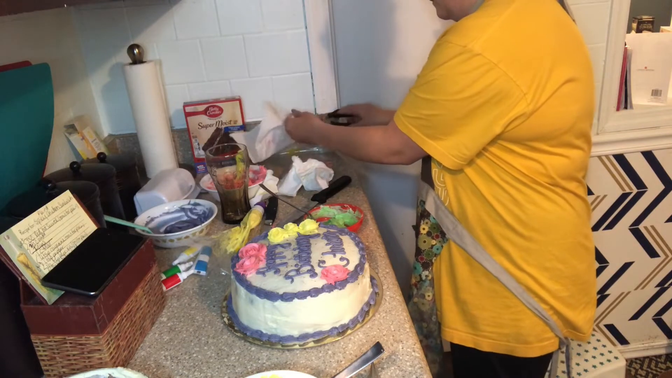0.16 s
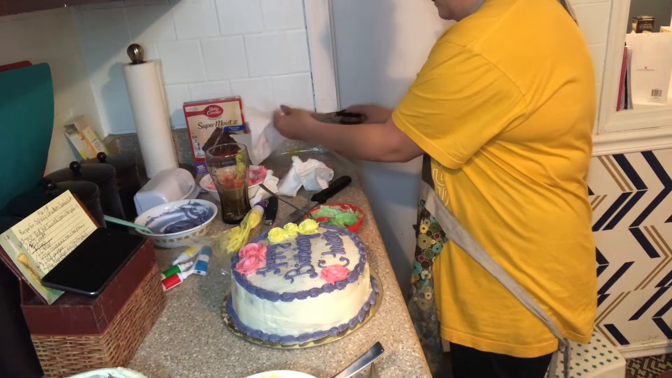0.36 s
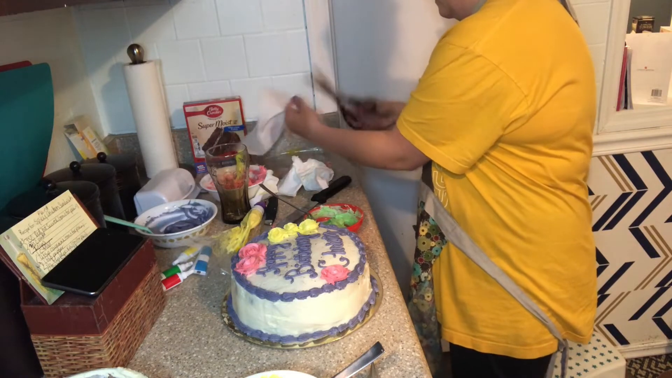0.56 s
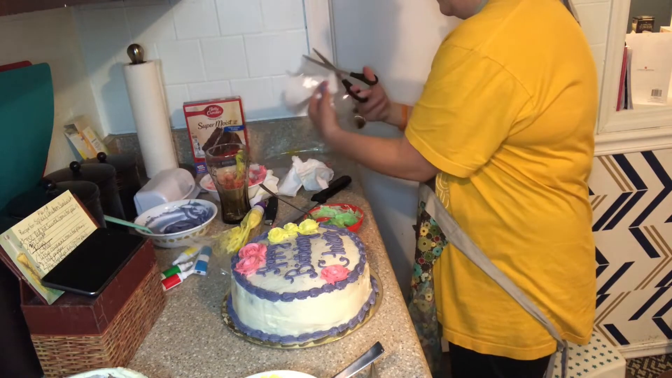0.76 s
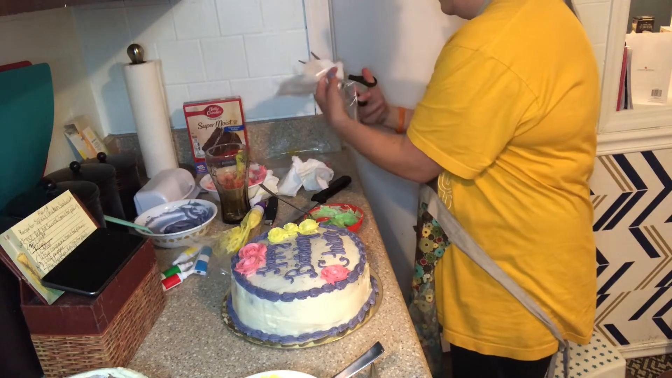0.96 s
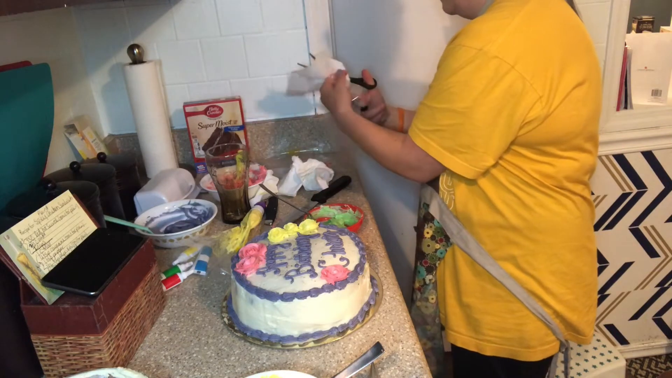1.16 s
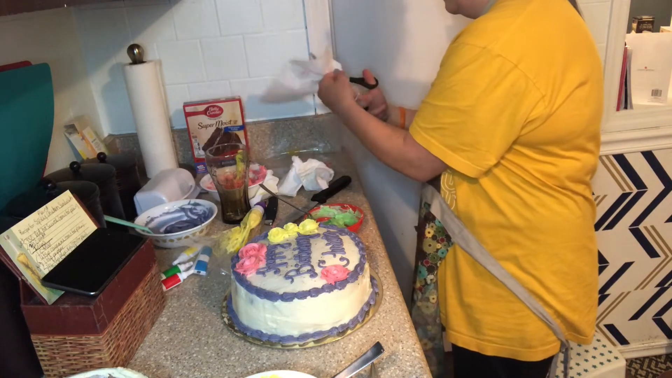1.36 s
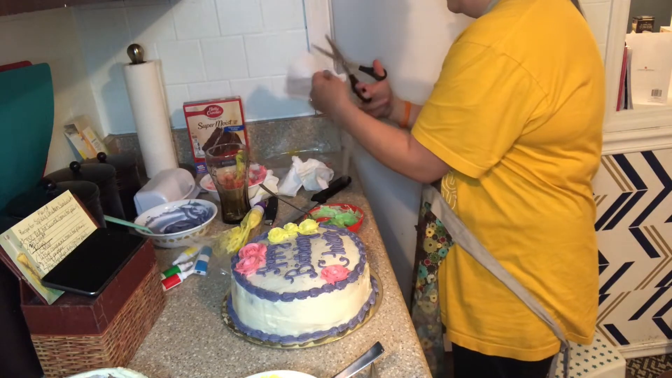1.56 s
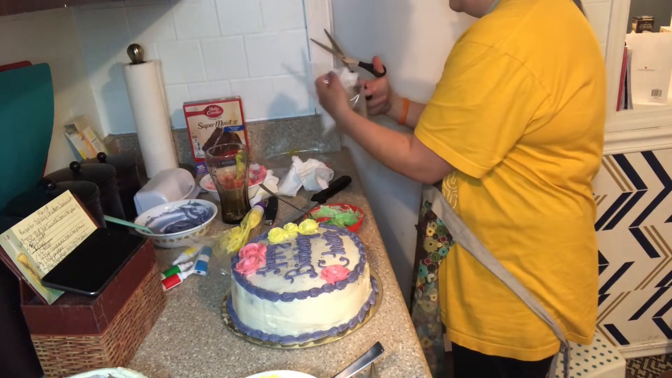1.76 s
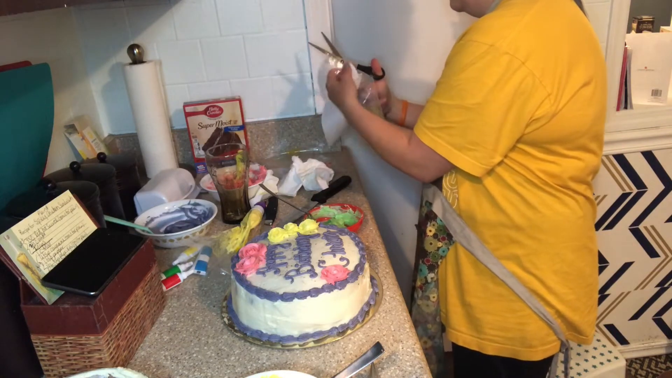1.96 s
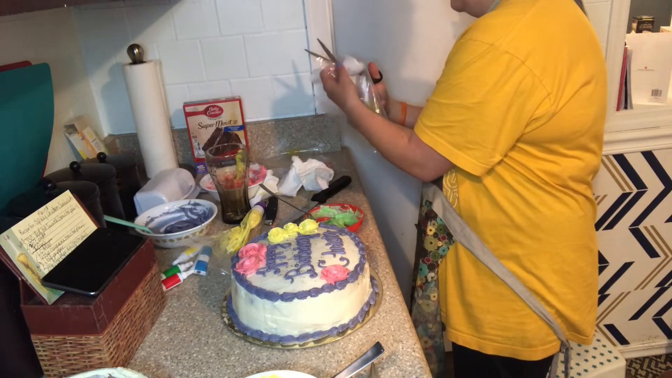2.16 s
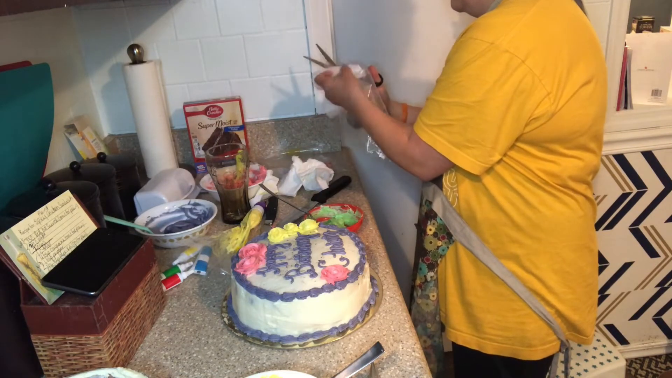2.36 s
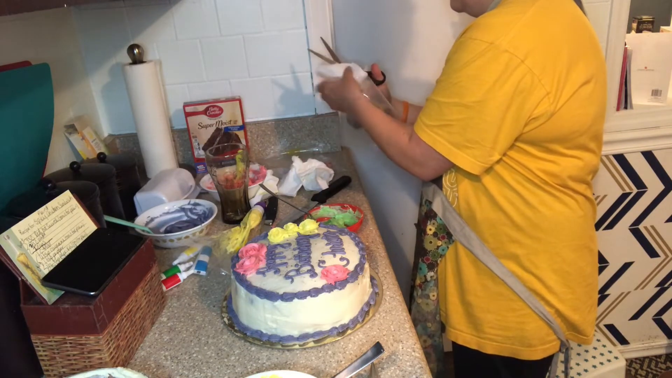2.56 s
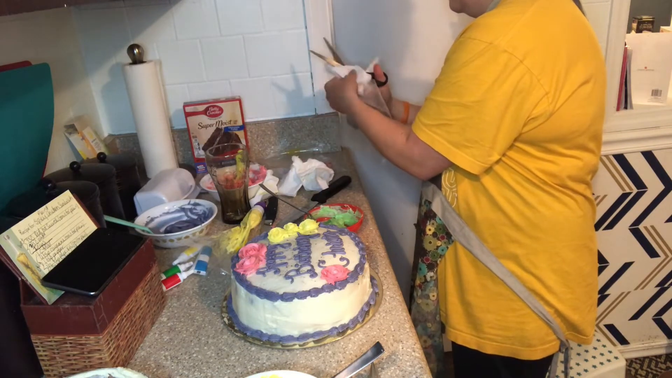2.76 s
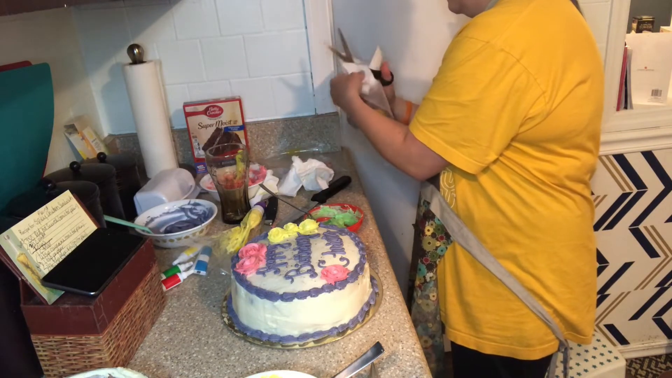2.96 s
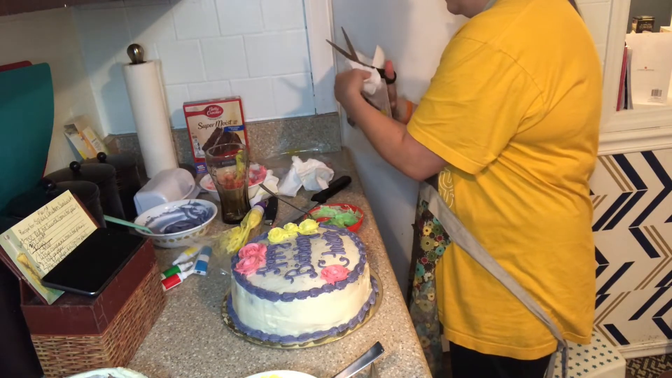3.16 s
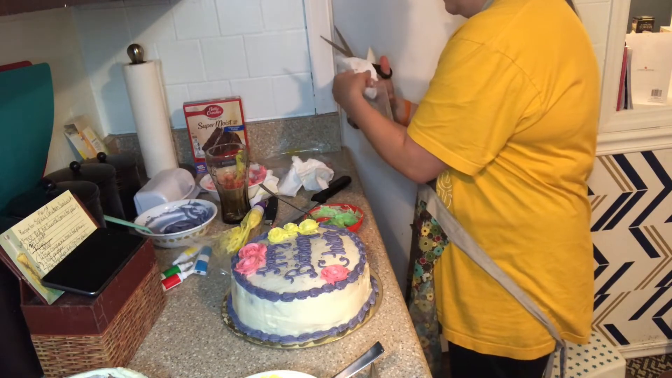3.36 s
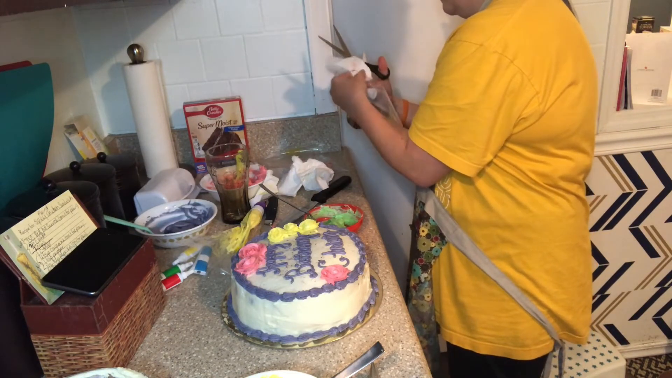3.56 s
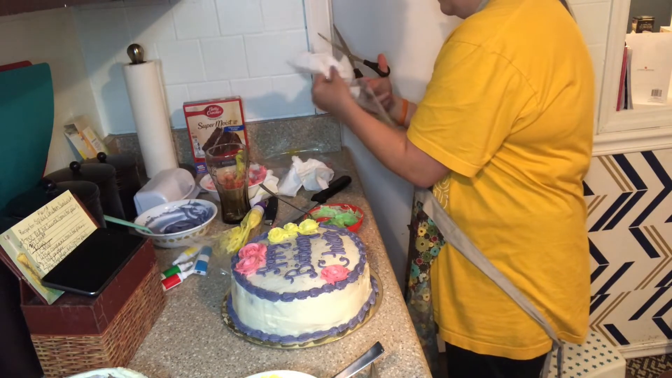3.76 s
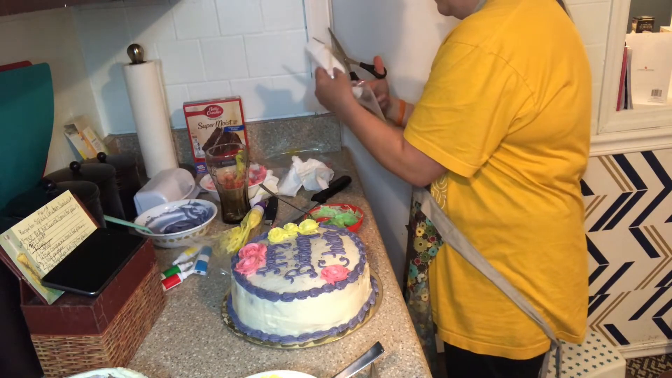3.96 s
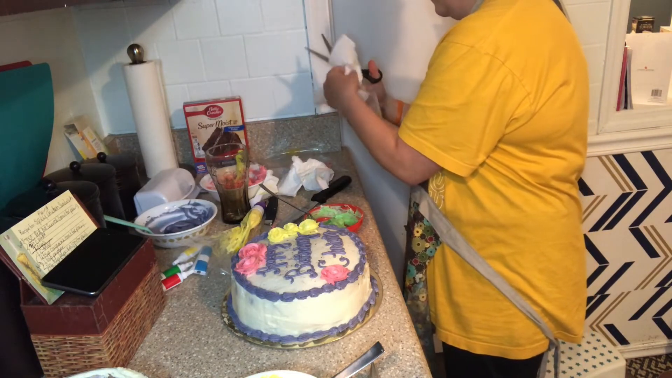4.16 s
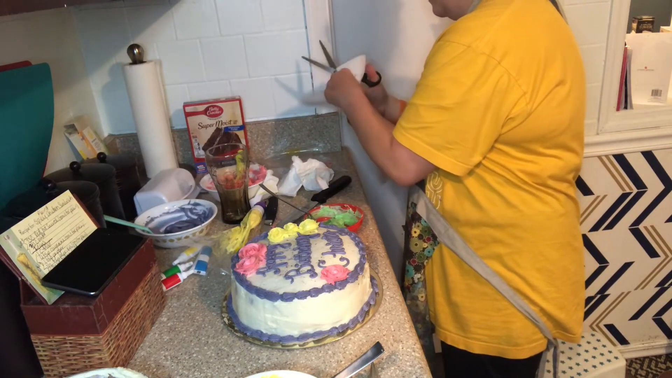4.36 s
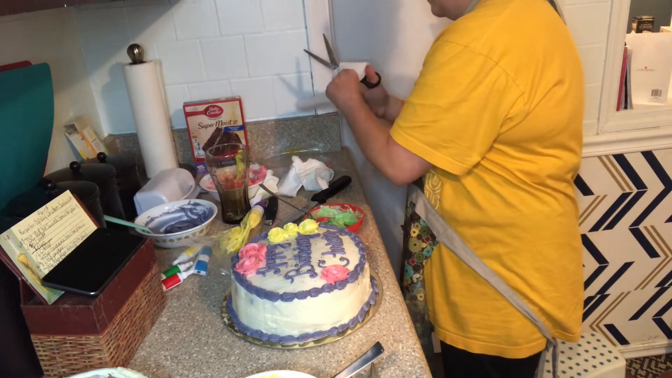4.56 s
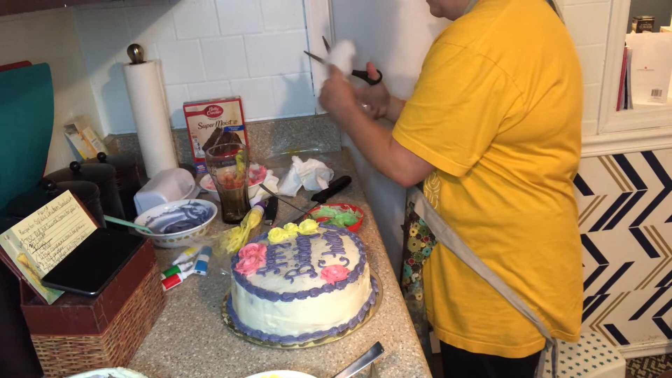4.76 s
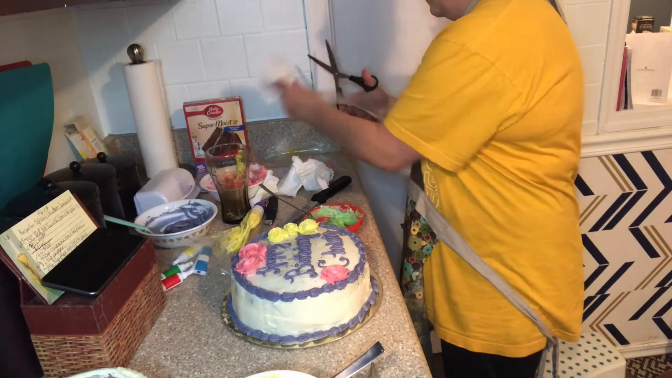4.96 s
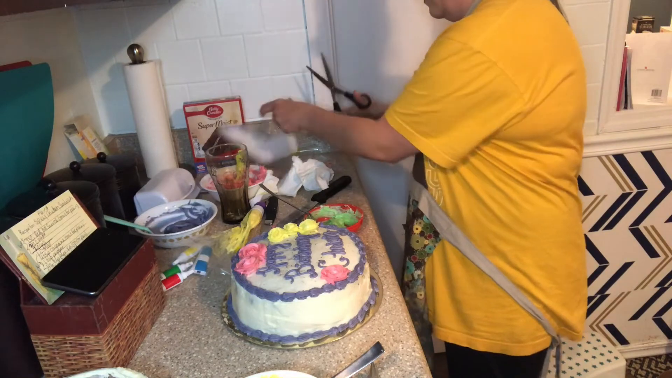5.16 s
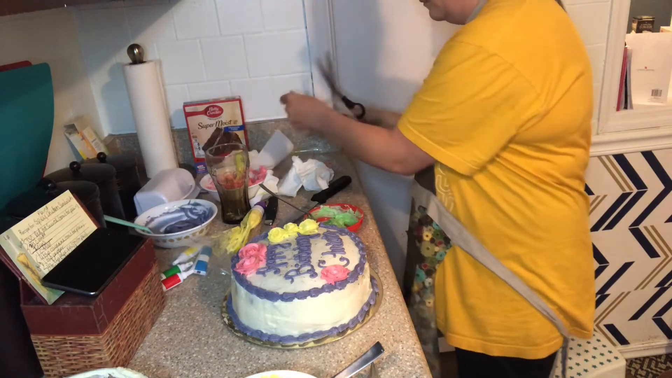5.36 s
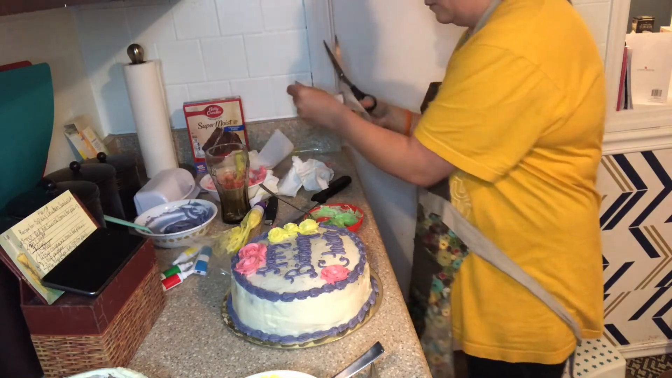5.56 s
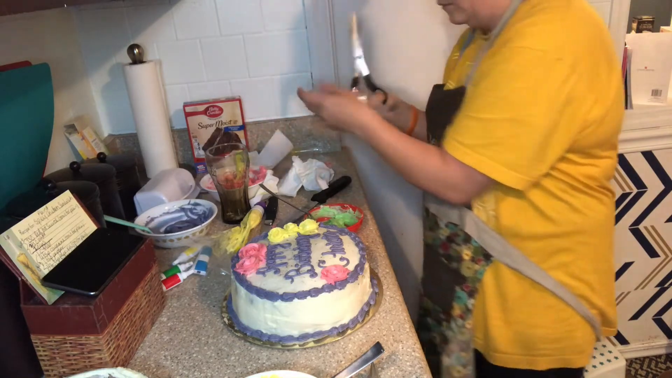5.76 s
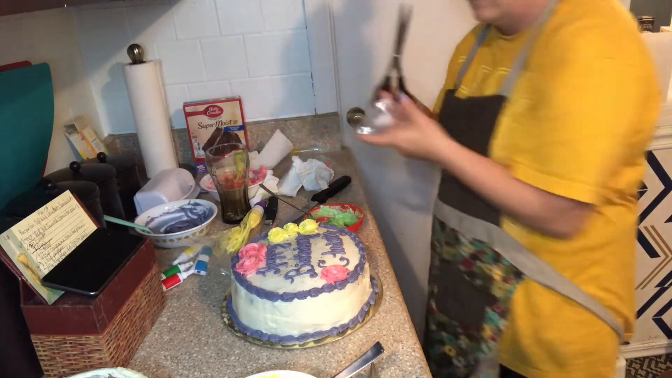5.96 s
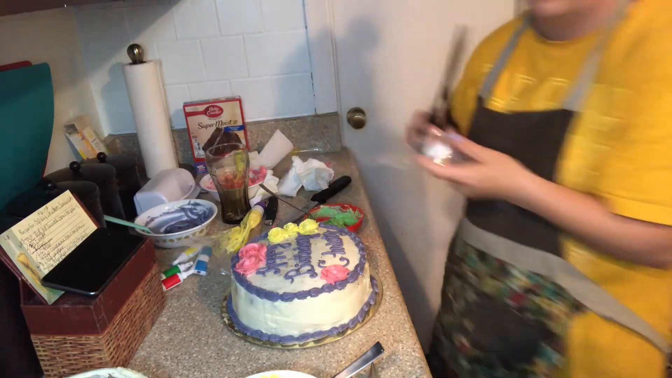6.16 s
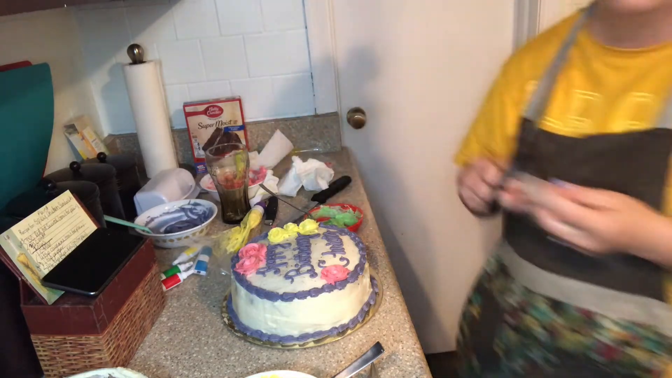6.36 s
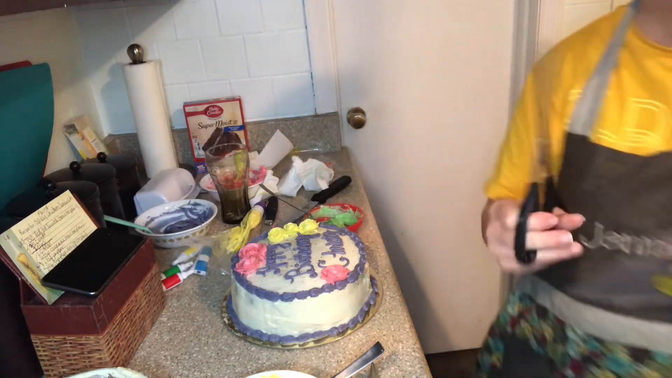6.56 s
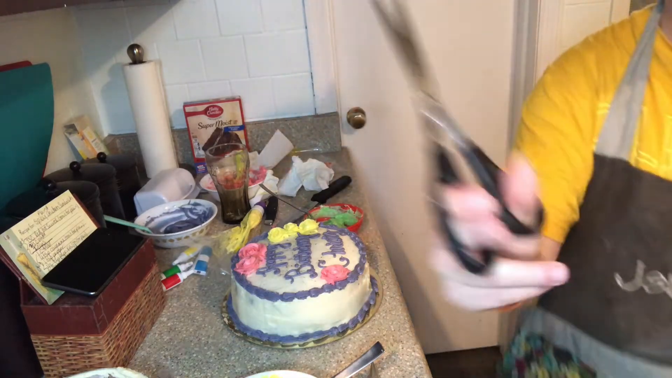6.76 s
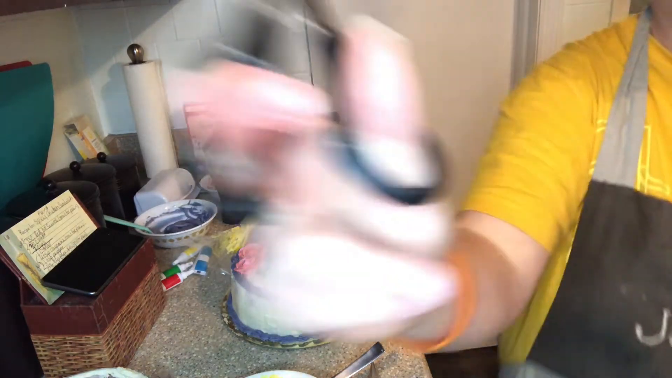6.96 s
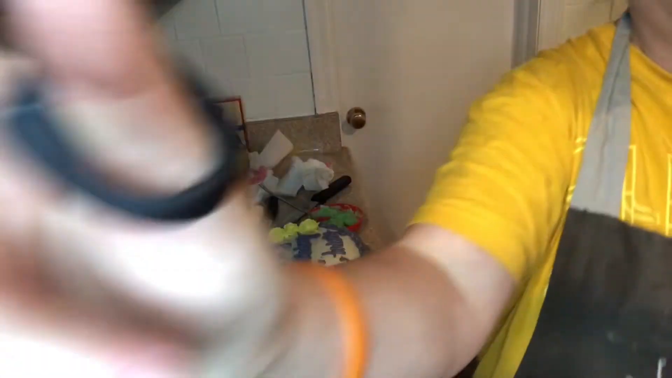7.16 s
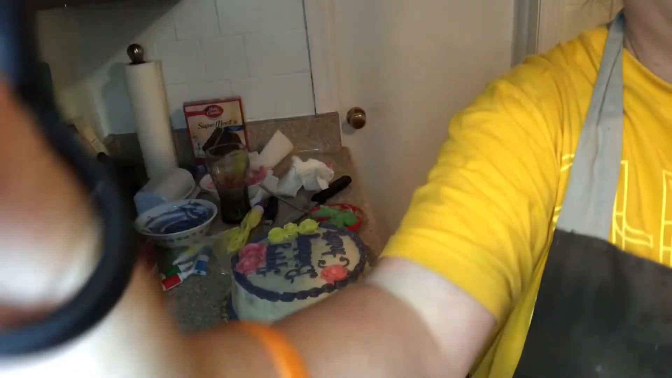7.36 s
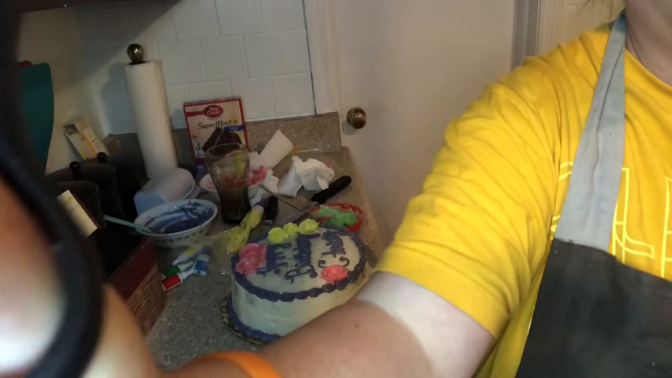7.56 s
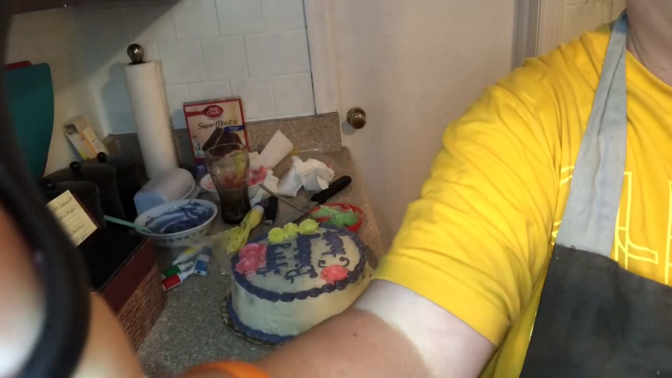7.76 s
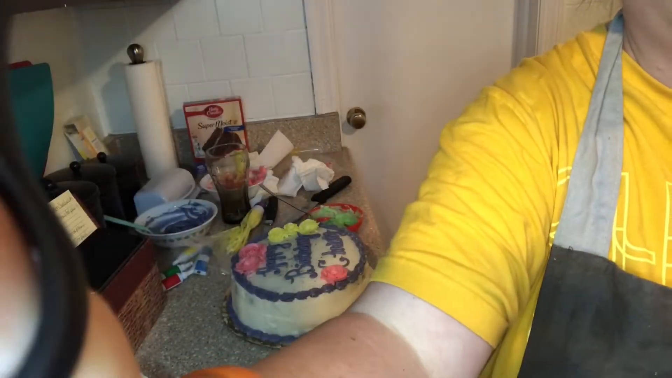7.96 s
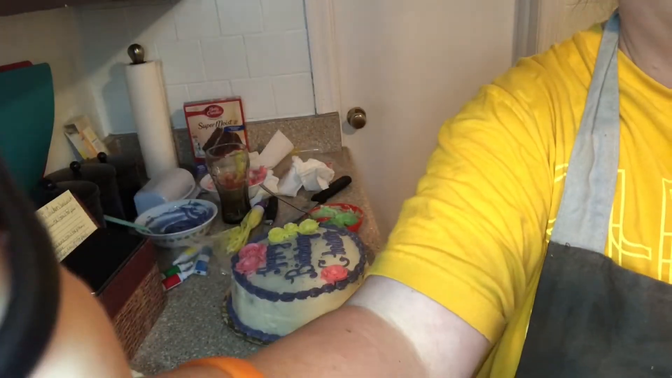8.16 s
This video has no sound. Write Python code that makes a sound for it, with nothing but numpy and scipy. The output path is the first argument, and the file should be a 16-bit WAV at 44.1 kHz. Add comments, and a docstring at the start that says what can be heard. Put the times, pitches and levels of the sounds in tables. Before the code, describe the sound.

Crisp plastic film crackling and sharp little snips over a faint appliance hum, ending with dull, close handling knocks.

```python
"""In a small kitchen an appliance hums over low rumble and faint hiss, built from two sines and coloured noise.
From the start fingers rustle a thin plastic piping bag: random crease flips, shaped by strokes and a pouch ring.
From 0.4 s the film snaps, snipped with scissors and crumpled: compact pulses with close echoes and a tail.
The low background stands higher from 2.05 to 7.55 s; near 7.3 and 7.5 s a close hand pushes air as rumble.
At 7.5 s skin hisses past the microphone port, and from 7.8 s fingers knock on the ringing microphone case."""
import sys
import numpy as np
from scipy import signal
from scipy.fft import rfft, irfft, next_fast_len
from scipy.io import wavfile

SR = 44100
rng = np.random.default_rng(int(sys.argv[2]) if len(sys.argv) > 2 else 0)


def master(y):
    """Save y as 16-bit WAV."""
    cut = np.clip(np.atleast_2d(y).T, -1, 1)
    pcm = np.round(cut * 32767)  # scale
    wavfile.write(sys.argv[1], SR, pcm.astype(np.int16))


N = 362061
TIME = np.arange(N) / SR


def from_db(db):
    """Decibels to gain."""
    return 10 ** (np.asarray(db) / 20)


def rms_one(x):
    """Scale to an rms of 1."""
    return x / np.sqrt(np.mean(x ** 2) + 1e-20)


def in_time(rows):
    """Draw the columns of a curve table at every sample."""
    s, *columns = np.transpose(rows)
    return [np.interp(TIME, s, column) for column in columns]


def at_hz(points, hz):
    """Read a spectrum on a log-frequency axis."""
    point_hz, value = np.transpose(points)
    return np.interp(np.log(hz), np.log(point_hz), value)


def bins(size):
    """Frequencies of an FFT, kept above zero."""
    return np.maximum(np.arange(size // 2 + 1) * SR / size, 1)


def bell(hz, centre_hz, octaves):
    """A resonance bump of height 1."""
    return np.exp(-(np.log2(hz / centre_hz) / octaves) ** 2)


def pulse(level_db):
    """The causal, most compact (minimum-phase) pulse that has this spectrum."""
    cepstrum = irfft(np.log(from_db(level_db)))
    half = len(cepstrum) // 2
    # folding the cepstrum forward packs the energy at the start
    cepstrum[1:half] *= 2
    cepstrum[half + 1:] = 0
    return irfft(np.exp(rfft(cepstrum)))[:half]


def split(x, centres_hz):
    """Overlapping bands that sum to x."""
    size = next_fast_len(len(x), real=True)
    size += size % 2
    spectrum = rfft(x, size)
    log_hz, log_centres = np.log(bins(size)), np.log(centres_hz)
    bands = []
    for share in np.eye(len(centres_hz)):
        weight = np.interp(log_hz, log_centres, share)
        bands.append(irfft(spectrum * weight)[:len(x)])
    return bands


def noise(colour):
    """Steady noise of a given colour; rms 1."""
    size = 2 * next_fast_len(N // 2 + 1)
    white = rfft(rng.standard_normal(size))
    gain = from_db(at_hz(colour, bins(size)))
    return rms_one(irfft(white * gain)[:N])


def drift(rate_hz):
    """Slow chance with a spread of 1: noise through two equal low-pass poles at rate_hz."""
    step, warm_up = 40, 2000  # samples per slow value; slow values dropped while the filter settles
    r = np.exp(-2 * np.pi * rate_hz * step / SR)
    white = rng.standard_normal(N // step + warm_up + 2)
    slow = signal.lfilter([1], [1, -2 * r, r * r], white)[warm_up:]
    return np.interp(np.arange(N) / step, np.arange(len(slow)), rms_one(slow))


def add(out, s, sound):
    """Mix a sound in at a time."""
    start = int(s * SR)
    out[start:start + len(sound)] += sound[:max(N - start, 0)]


# low rumble: pitch_hz, colour_db
RUMBLE_COLOUR = [(20, -46), (35, -17), (55, 4), (80, -0.5), (105, 4), (135, 2), (164, 2), (190, -8.5),
                 (280, -6.5), (450, -36), (900, -37)]
# still air of the room: pitch_hz, colour_db (per Hz, only its shape is used)
AIR_COLOUR = [(25, -125), (100, -100), (300, -94.5), (600, -101), (1200, -108), (2500, -113), (7500, -118),
              (9000, -123.5), (16000, -128)]
# the hand comes close and pushes air at the microphone: centre_s, width_s, rumble_rise_db
PUFFS = [(7.3, 0.066, 9.5), (7.5, 0.024, 4.5)]


def background(waver_db=2.5):
    """An appliance hums at twice the mains rate over low rumble and faint hiss."""
    hum_hz, octave_db = 119.8, -13
    swell_from_s, swell_to_s, swell_edge_s = 2.05, 7.55, 0.027
    inside_s = np.minimum(TIME - swell_from_s, swell_to_s - TIME)
    swell = np.clip(inside_s / swell_edge_s + .5, 0, 1)

    phase = 2 * np.pi * hum_hz * TIME
    tone = rms_one(np.sin(phase) + from_db(octave_db) * np.sin(2 * phase))
    hum_db = -71.5 + 7.5 * swell + waver_db * drift(rate_hz=4.8)

    rumble_db = -68.5 + 7 * swell
    for s, width_s, rise_db in PUFFS:
        rumble_db += rise_db * np.exp(-((TIME - s) / width_s) ** 2)

    hum = tone * from_db(hum_db)
    rumble = from_db(rumble_db) * noise(RUMBLE_COLOUR)
    hiss = from_db(-71.5) * noise(AIR_COLOUR)
    return hum + rumble + hiss


# echoes from the tiles and the counter: delay_s (before its random wander), gain (before energy scaling)
NEAR_ECHOES = [(.0009, 0.49), (.0026, 0.78), (.0058, 0.27)]


def near_path(scatter, scatter_s=0.0092, wander=.12):
    """First crack, its close echoes and the short, dense crackle that follows; energy 1."""
    t = TIME[:SR // 2]
    path = rng.standard_normal(len(t)) * np.exp(-(t / scatter_s) ** 2)
    path *= scatter / np.linalg.norm(path)
    path[0] += 1
    for delay_s, gain in NEAR_ECHOES:
        wandered_s = delay_s * np.exp(wander * rng.standard_normal())
        path[int(wandered_s * SR)] += gain
    return path / np.linalg.norm(path)


# kitchen decay: pitch_hz, t60_s
KITCHEN_DECAY = [(250, 0.37), (1000, 0.4), (2500, 0.4), (6000, 0.34), (14000, 0.3)]


def kitchen_tail(build_s=0.012):
    """Diffuse reverberation that builds up and dies soonest in the treble; energy 1."""
    t = TIME[:SR // 2]
    centres_hz, t60s = np.transpose(KITCHEN_DECAY)
    bands = split(rng.standard_normal(len(t)), centres_hz)
    decay = sum(band * np.exp(-np.log(1000) * t / t60_s) for band, t60_s in zip(bands, t60s))
    tail = decay * (1 - np.exp(-(t / build_s) ** 2))
    return tail / np.linalg.norm(tail)


def creases(per_s=750, spread_db=3.5, room_db=1.5, scatter=1.34, dwell_s=.18, count=8):
    """Tiny creases flip at random; as the hands move, their path through the room changes; rms 1."""
    strength = np.minimum(rng.exponential(1, N), 3.5)
    sizes = from_db(spread_db * strength) * rng.choice([-1, 1], N)
    flips = sizes * (rng.random(N) < per_s / SR)
    # the hands cycle through the spots; the random part blends one into the next
    spot = np.floor(TIME / dwell_s + .5 * rng.random(N)) % count
    out = np.zeros(N)
    for k in range(count):
        path = near_path(scatter) + from_db(room_db) * kitchen_tail()
        out += signal.fftconvolve(flips * (spot == k), path)[:N]
    return rms_one(out)


# faint crinkle of the bag held between strokes, before trim: start_s, level_db, treble_db
CRINKLE = [(0.0, -69, -70.5), (0.33, -65, -73), (0.7, -78, -77), (1.18, -60, -74), (1.87, -63, -71.5),
           (2.32, -61.5, -59.5), (3.28, -66.5, -69), (3.4, -67.5, -72), (4.69, -57, -61), (4.9, -57.5, -59),
           (5.29, -70, -74), (5.64, -81, -81), (5.97, -62.5, -69), (6.39, -62, -63), (6.56, -74, -80),
           (6.76, -80, -77), (7.16, -67.5, -73), (7.45, -83.5, -85)]
# strokes of the fingers over the film: full_speed_s, level_db, rise_s, hold_s,
# press_db (body, relative to level), slide_db (sheen, relative to level)
STROKES = [(0.246, -51, 0.07, 0.076, -33, -15), (0.301, -55.5, .02, 0.0091, -12, -4.5),
           (0.817, -56.5, 0.033, 0.015, -5, -12), (1.028, -52.5, 0.015, 0.016, -8.5, -16),
           (1.389, -50, 0.032, 0.053, -6, -14.5), (1.863, -62, 0.033, 0.026, 4, -13),
           (2, -58.5, 0.024, 0.045, -7, -14), (2.087, -58, 0.039, 0.068, 2, -5),
           (2.186, -50.5, .012, 0.031, -8, -7), (2.24, -57, .012, 0.0087, 7.5, -21),
           (2.366, -59, 0.031, 0.042, 3, -0.5), (2.493, -57.5, 0.024, 0.089, 0.5, -10),
           (2.642, -56, 0.026, 0.014, 0, -7.5), (2.86, -58.5, 0.039, 0.019, -1, -5.5),
           (3.084, -51.5, 0.023, 0.019, -2, -10.5), (3.195, -61.5, .04, 0.033, 2.5, -10),
           (3.269, -55.5, 0.055, 0.03, -2, -2.5), (3.377, -63, 0.028, 0.0046, 2, -7),
           (3.635, -59, 0.054, 0.083, 2.5, -1.5), (4.106, -62.5, 0.043, .03, 5.5, -5.5),
           (4.253, -57, 0.044, 0.052, -0.5, -3), (4.462, -54.5, 0.023, 0.038, 0, -8),
           (4.557, -57.5, 0.024, .03, 0, -18), (4.76, -58.5, 0.035, 0.059, 3, -0.5),
           (4.88, -56, .015, 0.013, 1.5, -4), (5.135, -66.5, .01, 0.0069, 7, 0.5),
           (5.543, -65.5, 0.023, 0.08, 3.5, -10.5), (5.776, -56.5, 0.026, 0.016, -4, -6),
           (5.903, -66, .02, 0.023, 1, -1), (6.046, -52, 0.021, 0.013, -2.5, -6),
           (6.282, -56, 0.026, 0.026, 3, -7), (6.324, -57, .02, 0.045, 3.5, -9),
           (6.442, -50.5, 0.034, .012, -19, -8), (6.847, -65, 0.024, 0.008, -4, -6.5),
           (6.909, -61.5, 0.018, 0.056, -1, -1.5), (7.129, -68, .03, 0.016, 11, -4),
           (7.247, -55.5, 0.043, 0.012, -7.5, 2), (7.336, -74.5, 0.0092, .006, 17.5, -20)]


def handling():
    """Each stroke swells, holds and settles on top of the faint crinkle; gives level, body and sheen in dB."""
    settle_db_per_s = 157  # the creases calm down after every stroke
    crinkle_trim_db, sheen_trim_db = -0.5, -4
    crinkle_db, treble_db = in_time(CRINKLE)
    # the body follows only a share of the crinkle's swing
    body_db = -67 + 0.41 * (crinkle_db - crinkle_db.mean())
    at_rest_db = -settle_db_per_s * np.maximum(TIME - CRINKLE[-1][0], 0)
    held_db = np.array([crinkle_db + crinkle_trim_db, body_db, treble_db + sheen_trim_db])
    power = from_db(held_db + at_rest_db) ** 2

    # the film creaks as it is pulled taut, just before each snap
    loads = []
    for s, db, low_db, slope_db, _, _, linger_db in SNAPS:
        loads.append((s, db + linger_db - 50, 0.012, 0, low_db, slope_db - 1))

    for s, db, rise_s, hold_s, press_db, slide_db in list(STROKES) + loads:
        near = slice(*np.searchsorted(TIME, [s - .5, s + .5]))
        t = TIME[near] - s
        rise = np.exp(-(np.minimum(t, 0) / rise_s) ** 2)
        envelope = rise * from_db(db - settle_db_per_s * np.maximum(t - hold_s, 0))
        power[:, near] += np.outer(from_db([0, press_db, slide_db]), envelope) ** 2
    level, body, sheen = 10 * np.log10(power + 1e-20)
    return level, body - level, sheen - level


# colour of the rustle: pitch_hz, colour_db (per Hz, for a rustle of 0 dB)
RUSTLE_COLOUR = [(35, -76), (125, -34), (250, -31), (340, -36), (480, -27), (800, -34), (1200, -34.5),
                 (1600, -32.5), (2100, -38), (4000, -34.5), (7700, -38.5), (10000, -42), (15500, -48)]
# the hollow of the bag rings high while it hangs open and low inside the cupped hand:
# start_s, ring_hz, ring_db (before the drain)
POUCH = [(0.1, 2390, 11), (0.26, 2170, 13), (1.0, 2270, 3.5), (1.45, 1900, 6.5), (2.14, 3000, 0),
         (2.19, 2900, 21), (2.27, 2500, 4.5), (2.7, 1980, 1.5), (2.9, 990, 5), (4.1, 990, 2),
         (4.5, 800, 8.5), (5.75, 810, 2.5), (6.35, 2600, -1), (6.48, 2590, 14), (6.85, 2540, -4.5),
         (7.25, 2750, 7)]


def rustle(patchy_db=2.5, pouch_octaves=0.21, pouch_drain=0.29):
    """Pressing the film deepens its creases, sliding adds sheen, and the pouch gathers them around its pitch."""
    level_db, body_db, sheen_db = handling()
    pouch_hz, pouch_db = in_time(POUCH)
    centres_hz = np.r_[35, np.geomspace(125, 16000, 22)]
    out = np.zeros(N)
    for band, hz in zip(split(creases(), centres_hz), centres_hz):
        # how far each band follows the body and the sheen
        low = at_hz([(900, 1.0), (1550, 0.045)], hz)
        high = at_hz([(2700, 0.062), (4600, 0.73), (8000, 0.93), (14000, 1.3)], hz)
        colour_db = at_hz(RUSTLE_COLOUR, hz) + low * body_db + high * sheen_db
        # the drain takes from every band a share of what the ring gains
        ring_db = pouch_db * (bell(hz, pouch_hz, pouch_octaves) - pouch_drain)
        patches_db = patchy_db * drift(rate_hz=21.4)
        out += band * from_db(level_db + colour_db + ring_db + patches_db)
    return out * np.sqrt(SR / 2)  # from level per Hz to full band


# snips and snaps of the film: start_s, level_db, body_db, slope_db (per octave of treble), ring_hz, ring_db,
# linger_db (tail, before trim)
SNAPS = [(0.4468, -10, -12, -16, 2120, 11.5, -2.5), (0.691, -28, -2, -9, 1580, 5, -18),
         (0.8391, -13.5, -29, -6.5, 7600, 0, -2.5), (0.9713, -14.5, -16, -15, 3300, 3, -2),
         (0.988, -5.5, -27, -13.5, 1970, 5, -7), (1.1275, -19, -2, -13, 3770, 6, -2),
         (1.169, -8.5, -8, -6.5, 2020, 10, -5), (1.2365, -15.5, -8, -11, 3020, 9, -7),
         (1.2578, -17.5, -25, -1, 4040, 10.5, -7.5), (1.5212, -19, 2, -14, 3100, 3, -10),
         (1.5982, -10, -17, -8.5, 930, 7, -5), (1.6026, -13, -11, -14, 2160, 5.5, -7),
         (1.6526, -11.5, -26, -11.5, 1880, 5.5, -10), (1.8826, -14, 0.5, -8.5, 3470, 8, -9),
         (1.9152, -13, -19, -10.5, 5440, 6, -0.5), (2.1692, -8.5, -1, -1.5, 3070, 2, 1),
         (2.206, -17, -6, -2, 1240, 11, -7), (2.4571, -14, -5, -0.2, 7400, 2, 3.5),
         (2.5535, -20, -3, -8.5, 5360, 16, 4.5), (2.642, -17.5, 4, -5.5, 2040, 8, 4.5),
         (2.746, -23.5, -6, -4, 5440, 6.5, -1), (2.9717, -14, 3, -5.5, 7590, 0, 1.5),
         (3.88, -18.5, 6.5, -7, 3660, 9, 2), (3.9615, -14, 0.5, -2.5, 3900, 7.5, -1),
         (4.194, -11, 0.5, -3.5, 1550, 5, 0.5), (4.363, -17, 1, -2.5, 7800, 1.5, 1.5),
         (4.433, -14, 5, -10, 790, 6, -0.5), (4.5267, -12, -1, 1.5, 7180, 1.5, 0.5),
         (4.6406, -12, -4, -11, 3950, 4, -1.5), (4.7798, -9.5, 3.5, -2, 7040, 4.5, 2),
         (5.0093, -14, 4.5, -3, 1360, 7, 2), (5.742, -16, -4, -2, 4060, 10.5, 1.5),
         (5.8745, -18.5, 3.5, -3, 8000, 1, 3), (6.033, -15, 8.5, -10, 1890, 4, -9),
         (6.048, -14, -5, -2.5, 3000, 5, -1), (6.2105, -10, -3, -1, 4630, 3, -1),
         (6.26, -15.5, -3, -13, 1190, 13.5, -14), (6.324, -16, 7, -4, 1100, 7, -16),
         (6.4238, -4, -1, -5.5, 2570, 1.5, 0.5)]
# colour of a plain snap: pitch_hz, colour_db
SNAP_COLOUR = [(60, -28), (200, -9.5), (400, -3.5), (2500, -1.5), (8000, -4.5), (16000, -18)]


def snaps(tail_db=-1.5, body_hz=700, film_hz=1500, bright_hz=2500, ring_octaves=0.49,
          crackle_db=12.5, crackle_growth=0.56):
    """The film gives way at once; the taut patch around it rings briefly at a pitch set by its size."""
    out, hz = np.zeros(N), bins(size=2048)
    body_share = at_hz([(body_hz, 1), (film_hz, 0)], hz)
    treble_octaves = np.maximum(np.log2(hz / bright_hz), 0)
    for s, db, body_db, slope_db, ring_hz, ring_db, linger_db in SNAPS:
        colour_db = at_hz(SNAP_COLOUR, hz) + body_db * body_share
        colour_db += slope_db * treble_octaves + ring_db * bell(hz, ring_hz, ring_octaves)
        # every snap is a crack with a short crackle; those that linger crackle more
        crackle = near_path(from_db(crackle_db + crackle_growth * linger_db))
        path = crackle + from_db(linger_db + tail_db) * kitchen_tail()
        add(out, s, signal.fftconvolve(pulse(colour_db + db), path))
    return out


# a fingertip brushes past the microphone port: start_s, level_db
BRUSH = [(7.45, -115), (7.48, -64.5), (7.515, -74), (7.54, -115)]
# colour of its hiss: pitch_hz, colour_db
BRUSH_COLOUR = [(3000, -35), (8000, -10), (12000, 0), (15500, -6)]


def brush():
    """Skin sliding close to the port gives a thin, high hiss."""
    level_db, = in_time(BRUSH)
    return from_db(level_db) * noise(BRUSH_COLOUR)


# fingers on the case: start_s, level_db, pitch_ratio, low_ring_db, high_ring_db, tick_db,
# scuff_db (relative to level)
KNOCKS = [(7.824, 2, 0.78, 2.5, 2, -52, -23.5), (7.8759, -33, 0.82, 12, 3, -60, -6),
          (7.883, -22, 1, 0, 9, -60, -13), (7.8893, -9, 0.76, 3, 2, -45, -19),
          (8.1660, 7, 0.82, 3.5, 3, -33, -15.5), (8.18, -13.5, 0.76, 26, 5, -45, -6),
          (8.1893, 10.5, 1.17, 19, 9, -34, -12), (8.1989, 8, 1.47, 17.5, 11, -10, -24)]
# colour of a soft knock, at pitch ratio 1: pitch_hz, colour_db
KNOCK_COLOUR = [(25, -41), (45, -20), (90, -35), (250, 3.5), (550, -2.5), (850, -0.5), (1250, -18),
                (1800, -40), (3000, -44), (8000, -71)]
# colour of the tick that starts it: pitch_hz, colour_db
TICK_COLOUR = [(300, -16), (1500, 11), (3200, -10.5), (4400, -3), (6000, -26), (9000, -41), (16000, -48)]
# colour of skin dragging after it, at pitch ratio 1: pitch_hz, colour_db
SCUFF_COLOUR = [(40, -2), (130, 14), (400, 10.5), (1300, 3), (1900, -15), (2800, -20), (5000, -40),
                (9000, -46), (16000, -52)]


def knocks(scuff_s=0.0078):
    """Dry, dull blows that reach the microphone through its case, whose ring differs from knock to knock."""
    out, hz, t = np.zeros(N), bins(size=8192), TIME[:SR // 10]
    # the two resonances of the case
    case_low = bell(hz, centre_hz=584, octaves=0.26)
    case_high = bell(hz, centre_hz=840, octaves=0.2)
    for s, db, pitch, low_db, high_db, tick_db, scuff_db in KNOCKS:
        rings_db = low_db * case_low + high_db * case_high
        add(out, s, pulse(db + at_hz(KNOCK_COLOUR, hz / pitch) + rings_db))
        add(out, s, pulse(tick_db + at_hz(TICK_COLOUR, hz)))
        drag = rng.standard_normal(len(t)) * np.exp(-t / scuff_s)
        skin = pulse(db + scuff_db + at_hz(SCUFF_COLOUR, hz / pitch))
        add(out, s, signal.fftconvolve(skin, drag / np.linalg.norm(drag)))
    return out


def scene():
    """Everything at one microphone."""
    return (background() + rustle() + snaps() + brush() + knocks())[None]


def record(dry):
    """The top is cut steeply above 15.9 kHz by an elliptic low-pass."""
    low_pass = signal.ellip(10, .2, 70, 15900, fs=SR, output="sos")  # order, ripple dB, stopband dB, Hz
    return signal.sosfilt(low_pass, dry)


dry = scene()
out = record(dry)
master(out)
```